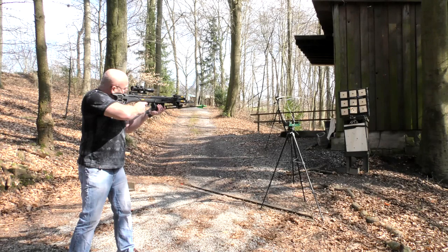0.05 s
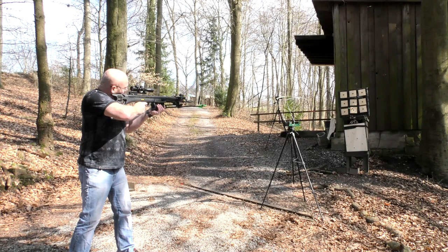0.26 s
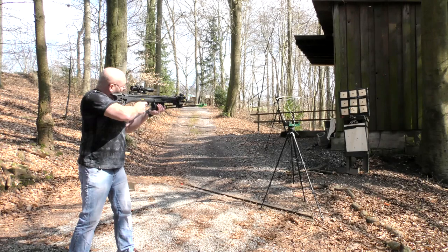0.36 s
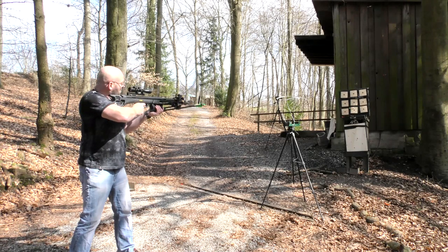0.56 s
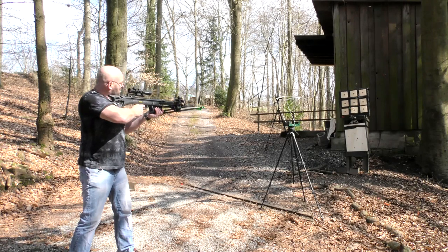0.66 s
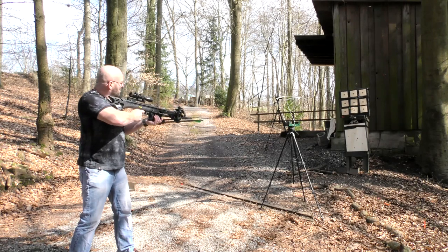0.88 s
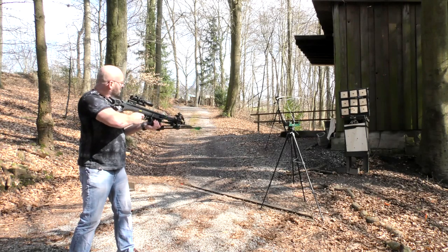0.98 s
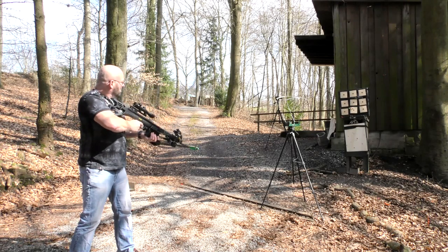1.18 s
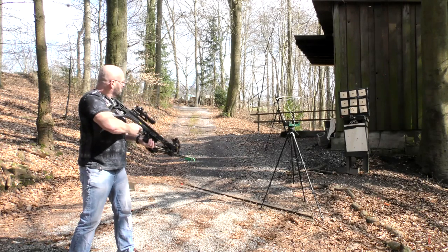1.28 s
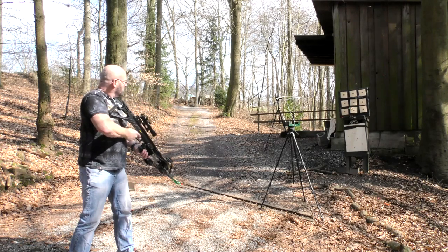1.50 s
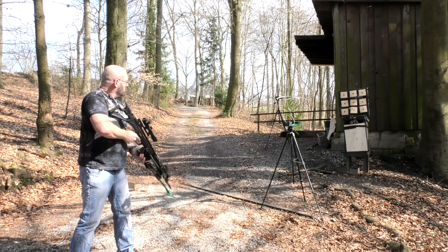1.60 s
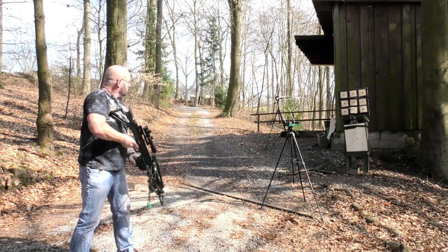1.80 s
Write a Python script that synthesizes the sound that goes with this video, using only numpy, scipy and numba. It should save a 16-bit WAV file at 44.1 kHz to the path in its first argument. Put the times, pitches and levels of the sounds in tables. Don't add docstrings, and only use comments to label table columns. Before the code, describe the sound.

A crossbow fires a few metres from a small camera microphone: a sharp string slap, then a deep bolt thump into the target, woodland echoes, light ticks on dry leaves, faint birds and a catch click.

```python
import sys
import numpy as np
from scipy import signal
from scipy.fft import rfft, irfft
from scipy.io import wavfile
from scipy.ndimage import uniform_filter1d
from numba import njit

SR = 44100
rng = np.random.default_rng(int(sys.argv[2]) if len(sys.argv) > 2 else 0)


def field_ratio(decibels):
    return 10 ** (np.asarray(decibels, dtype=float) / 20)


def file_out(sig):
    cols = np.atleast_2d(sig).T
    lim = np.clip(cols, -1, 1)
    pcm = np.round(lim * 32767).astype(np.int16)
    wavfile.write(sys.argv[1], SR, pcm)


N = 81585
T = np.arange(N) / SR
HZ = np.arange(N // 2 + 1) * SR / N

HIT_S = 0.3223
WASH_S = 0.34


def table(points, hz):
    p = np.array(points, float)
    return np.interp(np.log(np.maximum(hz, 1)), np.log(np.maximum(p[:, 0], 1)), p[:, 1])


def colour(x, points):
    return irfft(rfft(x) * field_ratio(table(points, HZ)), N)


def unit(x):
    return x / np.sqrt(np.mean(x ** 2))


def noise(points):
    return unit(colour(rng.standard_normal(N), points))


def low_cut(x, hz):
    return signal.sosfilt(signal.butter(2, hz, "high", fs=SR, output="sos"), x)


def fade(s, t60, rise=0.0004):
    t = np.maximum(T - s, 0)
    return (1 - np.exp(-t / rise)) * np.exp(-np.log(1000) * t / max(t60, 0.002))


def ring(x, modes):
    t = T[:SR // 5]
    response = 0
    for hz, db, t60 in modes:
        decay = np.exp(-np.log(1000) * t / max(t60, 0.002))
        response = response + field_ratio(db) * np.sin(2 * np.pi * hz * t) * decay
    return signal.fftconvolve(x, response / np.abs(response).max())[:N]


def walk(rate):
    held = rng.standard_normal(2000)[(T * rate).astype(int)]
    step = int(SR / rate)
    return unit(uniform_filter1d(uniform_filter1d(held, step), step))


# (frequency [Hz], side minus mid [dB])
NEAR_SIDE = [(60, 2), (110, -35.5), (200, -32), (370, -22.5), (670, -37.5), (1220, -27), (2230, -11.5),
             (4080, -12.5), (7460, -2), (13600, 2.5)]
# (frequency [Hz], side minus mid [dB])
WASH_SIDE = [(60, -13.5), (110, -29.5), (200, -37), (370, -33), (670, -19), (1220, -15.5), (2230, -7.5),
             (4080, -6.5), (7460, -1), (13600, 1)]


def ports(x, side, pan_db=0.0):
    smear = unit(rng.standard_normal(96) * np.exp(-np.arange(96) / 30)) / np.sqrt(96)
    difference = colour(signal.fftconvolve(x, smear)[:N], side)
    pan = field_ratio(np.array([[pan_db], [-pan_db]]) / 2)
    return np.array([x + difference, x - difference]) * pan


# (frequency [Hz], level per Hz [dB])
WOOD = [(25, 5), (100, -8), (250, -11), (450, -4.5), (1200, -12.5), (5000, -27), (7700, -29.5),
        (14000, -34.5)]
# (frequency [Hz], side minus mid [dB])
WOOD_SIDE = [(60, 1.5), (110, -14), (200, -14), (370, -15), (670, -11), (1220, -5.5), (2230, -2),
             (4080, 2.5), (7460, 1.5), (13600, 2)]


def wood():
    mid = noise(WOOD)
    side = colour(noise(WOOD), WOOD_SIDE)
    wind = []
    for _ in range(2):
        rumble = noise([(20, 0.5), (70, -5.5), (200, -32), (400, -52.5)])
        wind.append(rumble * field_ratio(-71.5 + 3 * walk(4.7)))
    air = np.array([mid + side, mid - side])
    return field_ratio(-55 + 0.65 * walk(2.9)) * air + np.array(wind)


# (time [s], length [s], start pitch [Hz], end pitch [Hz], level [dB])
BIRDS = [(1.05, .17, 8150, 8150, -77), (1.07, .08, 7100, 7100, -75), (1.21, .04, 5200, 5150, -70),
         (1.25, .06, 5250, 5200, -75), (1.278, .035, 3950, 3830, -59), (1.305, .05, 3660, 3660, -54),
         (1.285, .08, 3500, 3480, -62), (1.345, .23, 3550, 3490, -55), (1.40, .1, 3620, 3400, -63),
         (1.53, .4, 3520, 3470, -67), (1.555, .035, 3900, 3950, -59)]


def birds():
    blur_rate = 2 * 130
    out = 0
    for s, length, hz, end_hz, db in BIRDS:
        pitch = hz + (end_hz - hz) * np.clip((T - s) / length, 0, 1)
        shape = np.clip(np.minimum(T - s, s + length - T) / 0.02, 0, 1)
        blur = 1 + 0.6 * (walk(blur_rate) + 1j * walk(blur_rate))
        whistle = np.real(blur * np.exp(2j * np.pi * np.cumsum(pitch) / SR))
        trill = field_ratio(db + 1.2 * walk(60))
        out = out + trill * shape * whistle
    return ports(out, NEAR_SIDE, pan_db=3.0)


# (time [s], length [s], level [dB])
BOOMS = [
    (0.34, 0.2, -43.5),
    (0.53, .16, -41),
    (1.72, .16, -55),
]


def booms():
    swell = 0
    for s, length, db in BOOMS:
        swell = swell + field_ratio(db) * np.sin(np.pi * np.clip((T - s) / length, 0, 1))
    rumble = noise([(45, -33.5), (95, -4), (200, -1.5), (300, -18), (600, -45)])
    return ports(swell * rumble, WASH_SIDE)


# (frequency [Hz], level [dB], t60 [s])
LATE_MODES = [(420, -1, .06), (480, 0, .06), (555, -1, .06)]


def late():
    tones = unit(ring(rng.standard_normal(N), LATE_MODES))
    return ports(field_ratio(-36) * fade(WASH_S, 2.2, rise=0.35) * tones, WASH_SIDE)


# (frequency [Hz], level per Hz [dB])
WASH = [(70, -16), (300, -8), (400, 5), (600, 1.5), (800, -5.5), (1150, 5), (7500, -15.5), (14000, -36)]
# (frequency [Hz], t60 [s])
WASH_T60 = [(60, 0.83), (150, 1.55), (500, 1.59), (1200, 1.4), (2200, 1.194), (3200, 1.05), (5000, 0.92),
            (10000, 0.49)]


def wash():
    mid = low_cut(low_cut(noise(WASH), 70), 70)
    side = colour(noise(WASH), WASH_SIDE)
    spectra = rfft(np.array([mid + side, mid - side]))
    shared = walk(15.33)
    out = 0
    for k in range(25):
        hz = 60 * 2 ** (k / 3)
        window = np.clip(1 - 3 * np.abs(np.log2(HZ / hz + 1e-9)), 0, 1)
        band = irfft(spectra * window, N)
        patches = field_ratio(1 * shared + 0.57 * walk(21.5))
        out = out + band * fade(WASH_S, table(WASH_T60, hz), rise=0.01) * patches
    return field_ratio(-20.5) * out


# (frequency [Hz], level [dB], t60 [s])
HUM_MODES = [(413.2, -1, .12), (468, -4.5, .12), (511.6, 0, .12), (560.6, 1.5, 0.11), (1039, -1.5, 0.088),
             (1122, -3, .08), (1252, 0.5, .08), (1366, -3.5, 0.086), (2173, -2, .04), (2332, -5.5, 0.046)]


def hum():
    tones = unit(ring(rng.standard_normal(N), HUM_MODES))
    return ports(field_ratio(-29) * fade(WASH_S, 1.957, rise=0.02) * tones, WASH_SIDE)


# (time [s], frequency [Hz], level [dB], t60 [s])
TICK_RINGS = [(0.8006, 4950, -40, 0.024), (0.806, 3250, -40, 0.04), (.8080, 2170, -34, 0.016),
              (.8655, 3170, -41, .04), (0.8646, 4400, -46, .02), (1.3805, 1990, -41, 0.041),
              (1.381, 413, -47, 0.023), (1.3690, 8000, -49, .02), (1.5400, 7000, -46, .01),
              (.5424, 11300, -25, .025), (.5430, 8000, -29, .03), (.7422, 11300, -42, .02),
              (.7430, 4900, -48, .02), (.8649, 8300, -40, .02), (.2412, 3750, -9, .016),
              (.2620, 3600, -18, .04), (.3225, 2300, -12, .012)]


def tick_rings():
    rings = 0
    for s, hz, db, t60 in TICK_RINGS:
        tone = noise([(hz / 1.16, -30), (hz / 1.07, 0), (hz * 1.05, 0), (hz * 1.5, -30)])
        rings = rings + field_ratio(db) * fade(s, t60, rise=0.0003) * tone
    return ports(rings, NEAR_SIDE, pan_db=-3.0)


# (time [s], level [dB], t60 [s], centre [Hz], fall per octave below it [dB])
TICKS = [
    (0.5422, -28, 0.047, 7600, 11),
    (0.7422, -46, 0.012, 8500, 15),
    (0.8022, -35, 0.043, 8000, 4.5),
    (0.8653, -42, 0.022, 7000, 1),
    (1.3112, -51, 0.0074, 5330, 0.5),
    (1.3682, -53, 0.028, 8000, 12),
    (1.3768, -47, 0.0091, 8470, -3),
    (1.3806, -38, 0.036, 8300, -2.5),
    (1.3925, -45.5, 0.15, 7900, -2),
]


def ticks():
    out = 0
    for s, db, t60, hz, fall_db in TICKS:
        grit = noise([(hz / 64, -6 * fall_db - 30.5), (hz / 32, -5 * fall_db - 2.5),
                      (hz / 1.1, -0.4 * fall_db), (hz, 0), (hz * 1.07, -3),
                      (hz * 1.62, -9), (hz * 1.6, -17)])
        tap = 2.5 * fade(s, 0.0023, rise=0.00005)
        crackle = fade(s, t60, rise=0.00017)
        scatter = field_ratio(-15) * fade(s, 0.37, rise=0.004)
        tick = field_ratio(db) * grit * (tap + crackle + scatter)
        out = out + ports(low_cut(tick, 480), NEAR_SIDE, pan_db=-1.5)
    return out


# (time [s], level [dB])
CATCH = [(1.506, -16), (1.5069, -25), (1.5079, -19.5), (1.509, -43), (1.511, -18.5), (1.5132, -32),
         (1.515, -31), (1.518, -32), (1.522, -35), (1.5222, -39), (1.540, -46), (1.5652, -39.5)]
# (frequency [Hz], level [dB], t60 [s])
CATCH_MODES = [(460, -2.5, 0.022), (1360, -12, 0.012), (2460, -12.5, 0.021), (2620, -3, 0.0064),
               (3950, -1, 0.0088), (4030, -4.5, 0.0066), (4590, -8, 0.006), (5980, -16, 0.006),
               (7000, -1.5, 0.0057), (8200, -6, 0.0027), (10020, -16, 0.024), (11080, -9.5, 0.0043)]


def catch():
    bursts = sum(field_ratio(db) * fade(s, 0.0051, rise=0.0001) for s, db in CATCH)
    knocks = bursts * rng.standard_normal(N)
    scatter = noise([(500, -12.0), (2500, 8.0), (4000, 7), (8000, -0.5), (14000, -13.5)])
    tail = field_ratio(-44) * fade(CATCH[0][0], 0.52, rise=0.0036) * scatter
    clicks = 0.71 * ring(knocks, CATCH_MODES) + 0.45 * knocks + tail
    return ports(low_cut(clicks, 2240), NEAR_SIDE)


# (time [s], level [dB])
KNOCKS = [
    (.2486, -6),
    (.2528, -10),
    (.2554, 0),
    (.2660, -6),
    (.2735, -14),
]
# (frequency [Hz], level [dB], t60 [s])
KNOCK_MODES = [(290, -7.5, 0.028), (900, -7, .004), (1150, -2.5, .018), (1750, -9.5, 0.021)]


def limbs():
    push = sum(-field_ratio(db) * np.exp(-((T - s) / 0.000091) ** 2) for s, db in KNOCKS)
    return ports(low_cut(0.11 * ring(push, KNOCK_MODES), 150), WASH_SIDE)


# (frequency [Hz], level per Hz [dB])
SLAP_COLOUR = [(88, -53.5), (150, -8), (1190, -4.5), (1490, -13), (1770, -2), (2310, -6), (7630, -8),
               (12700, -20.5), (14000, -35)]
# (frequency [Hz], level [dB], t60 [s])
BUTT = [(70, -21, .06), (118, -16.5, 0.12), (370, -4.5, 0.099), (440, -2, 0.071), (551, -0.5, 0.073),
        (1200, -8.5, .02), (2261, -7.5, 0.018)]
# (time [s], level [dB], t60 [s])
ECHOES = [
    (0.3254, -13.5, 0.02),
    (0.3342, -22, 0.093),
    (0.3602, -9.5, 0.044),
    (0.368, -23.5, 0.21),
    (0.408, -23, 0.29),
    (.428, -20.5, 0.084),
]
# (frequency [Hz], level per Hz [dB])
ECHO_COLOUR = [(47, -52), (80, -25), (274, -20), (405, -5), (741, -13.5), (1650, -11), (9490, -36),
               (13100, -53), (14000, -75)]


def thump():
    smack_s = 0.32055
    start_hz, end_hz, sag_s = 2300, 1150, 0.0007
    t = np.maximum(T - smack_s, 0)
    turns = end_hz * t + (start_hz - end_hz) * sag_s * (1 - np.exp(-t / sag_s))
    smack = field_ratio(15.5) * fade(smack_s, 0.0062, rise=0.00085) * np.sin(2 * np.pi * turns)

    push = np.exp(-((T - HIT_S) / 0.0011 * np.pi) ** 2)
    body = field_ratio(2.5) * ring(low_cut(push / push.sum(), 170), BUTT)
    crack = field_ratio(1.5) * fade(smack_s, 0.0074, rise=0.00024) * noise(SLAP_COLOUR)

    returns = sum(field_ratio(db) * fade(s, t60, rise=0.00074) for s, db, t60 in ECHOES)
    echo = noise(ECHO_COLOUR) * returns
    return ports(smack + body + crack + echo, WASH_SIDE)


# (time [s], level [dB], t60 [s], share of limb ring [0-1])
SLAPS = [
    (0.2391, -16.5, 0.022, 0.42),
    (0.2403, -3.5, 0.041, 0.1),
    (.2480, -6, 0.042, 0.49),
    (0.257, -15, 0.033, 0.5),
    (0.265, -16, .04, 1),
    (.2802, -15, .006, 0.3),
    (0.282, -22, 0.19, 0),
]
# (frequency [Hz], level [dB], t60 [s])
LIMBS = [(275, -5.5, 0.024), (550, -6, .05), (1148, -0.5, .03), (1700, -5.5, 0.015), (3710, -2, .012),
         (4710, -12.5, .012), (6300, -10, .012), (7200, -6.5, 0.035)]
# (frequency [Hz], level per Hz [dB])
SCATTER_COLOUR = [(88, -39), (150, -7), (281, 3), (556, -10.5), (1080, 4.5), (1550, -4), (3640, -6),
                  (12500, -24.5), (14000, -28)]


def bow():
    rattle = noise(SLAP_COLOUR)
    body = unit(ring(rng.standard_normal(N), LIMBS))
    knocks = np.zeros(N)
    sink = np.clip((HIT_S + 0.004 - T) / 0.0011, 0.15, 1)
    out = field_ratio(-19) * fade(SLAPS[1][0], 1.7, rise=0.0022) * sink * noise(SCATTER_COLOUR)
    for s, db, t60, share in SLAPS:
        share = np.clip(share, 0, 1)
        mix = (1 - share) * rattle + 0.26 * share * body
        out = out + field_ratio(db) * fade(s, t60, rise=0.00062) * mix
        knocks[int(s * SR)] = -field_ratio(db) * share
    low_ring = ring(uniform_filter1d(knocks, size=11), LIMBS[:4])
    return ports(low_cut(out + 2.1 * low_ring, 270), NEAR_SIDE, pan_db=0.2)


# (frequency [Hz], left minus right [dB])
LEAN = [(60, 1), (250, 1), (1000, -0.9), (2500, -0.95), (4500, -3.5), (6500, -5), (9000, 0), (13000, -0.4)]


def scene():
    surroundings = wood() + birds() + booms()
    answers = late() + wash() + hum()
    small_sounds = tick_rings() + ticks() + catch()
    shot = limbs() + thump() + bow()
    left, right = surroundings + answers + small_sounds + shot
    left = colour(left, [(hz, db / 2) for hz, db in LEAN])
    right = colour(right, [(hz, -db / 2) for hz, db in LEAN])
    return np.array([left, right])


@njit
def limiter(peak, top, attack, release, power):
    gain, follower = np.ones(len(peak)), 0.0
    for i in range(len(peak)):
        speed = attack if peak[i] > follower else release
        follower += (peak[i] - follower) * speed
        if follower > top:
            gain[i] = (top / follower) ** power
    return gain


def band_limit(x):
    return signal.sosfilt(signal.butter(12, 14230, fs=SR, output="sos"), x)


# (frequency [Hz], level [dB])
CAPSULE = [(20, -4.5), (5000, 0.5), (6000, -3), (7700, 2.5), (9300, -3.5), (11000, 1.5), (14000, 0.5)]


def record(dry):
    attack_s, release_s, ratio = 0.004, 0.03, 4
    peak = np.abs(dry).max(0)
    gain = limiter(peak, float(field_ratio(-4)), 1 / (attack_s * SR), 1 / (release_s * SR), 1 - 1 / ratio)
    top_cut = signal.ellip(8, 0.2, 55, 13600, fs=SR, output="sos")
    mix = signal.sosfilt(top_cut, colour(dry * gain, CAPSULE))
    mix = np.clip(mix, -1, 1)
    return band_limit(mix)


dry = scene()
out = record(dry)
file_out(out)
```